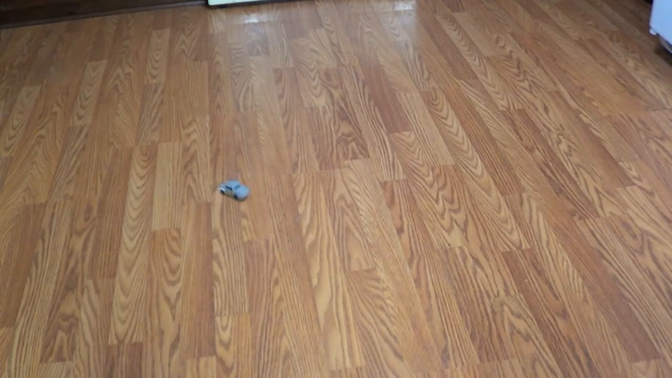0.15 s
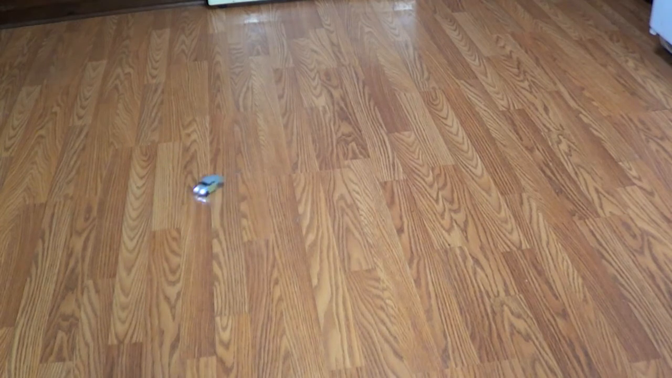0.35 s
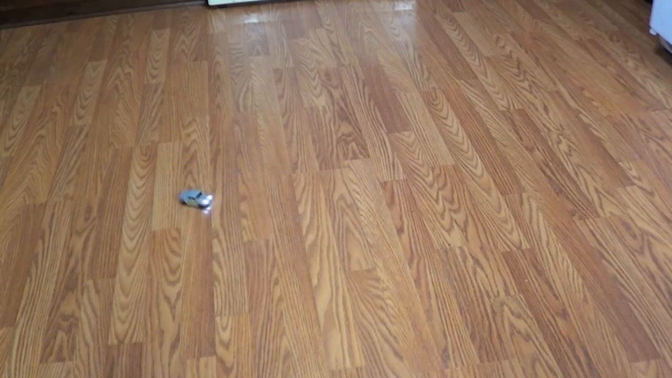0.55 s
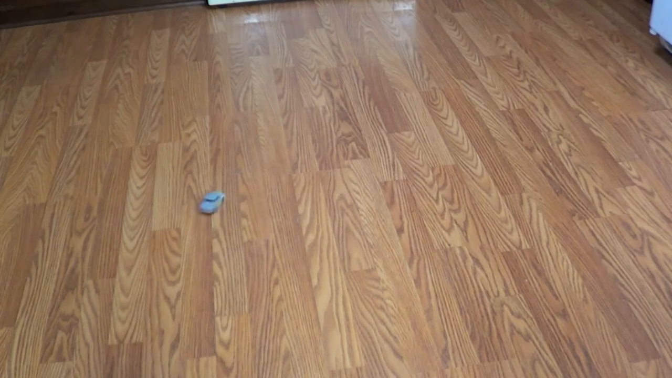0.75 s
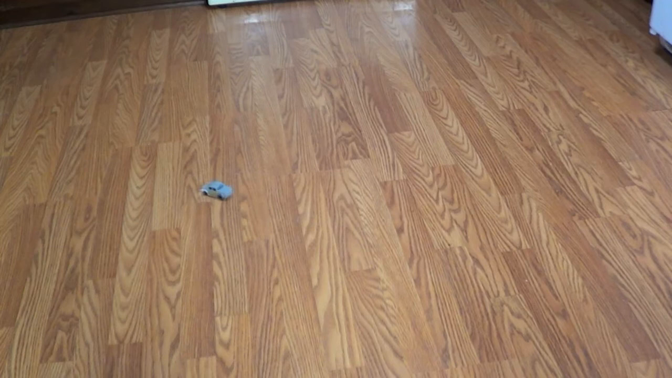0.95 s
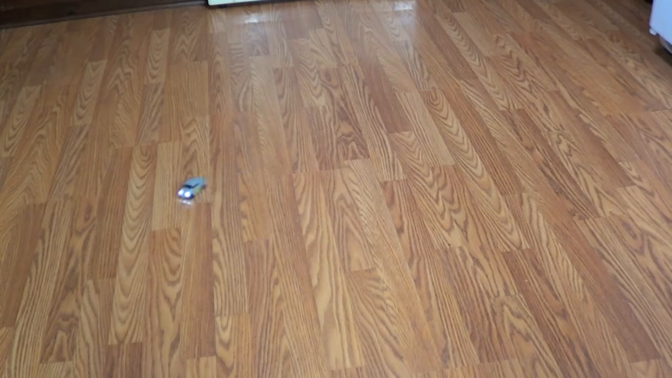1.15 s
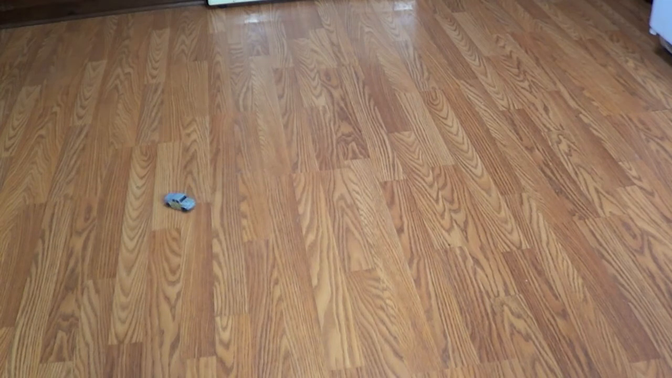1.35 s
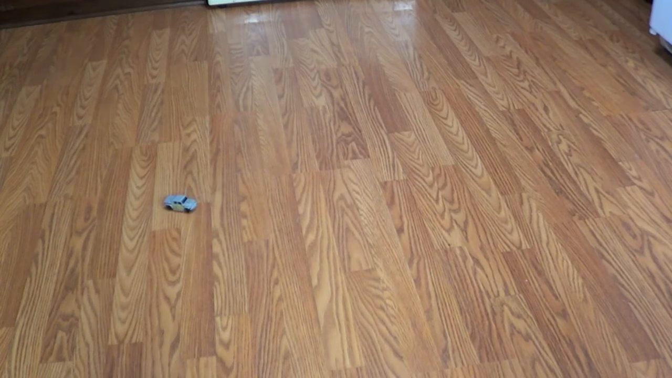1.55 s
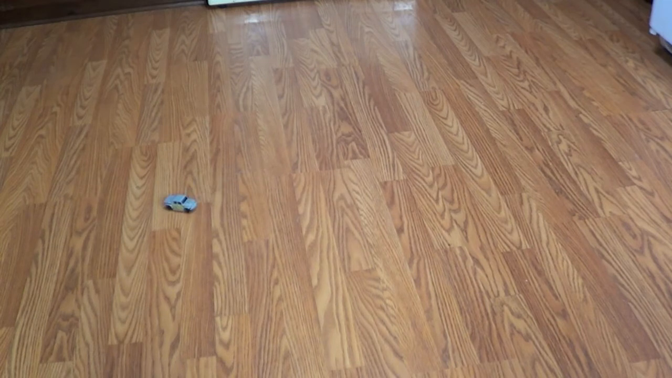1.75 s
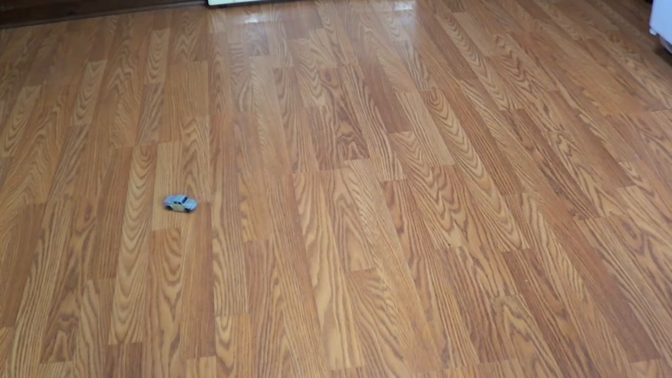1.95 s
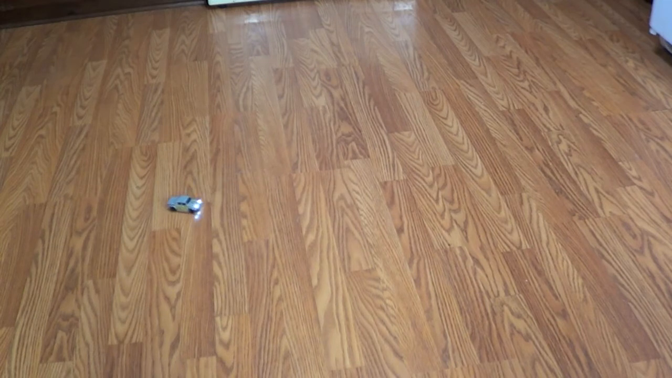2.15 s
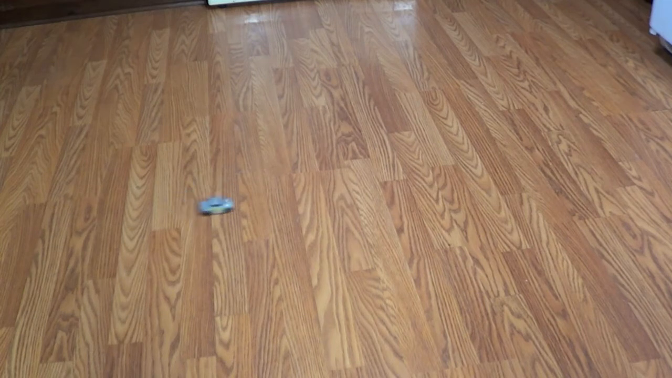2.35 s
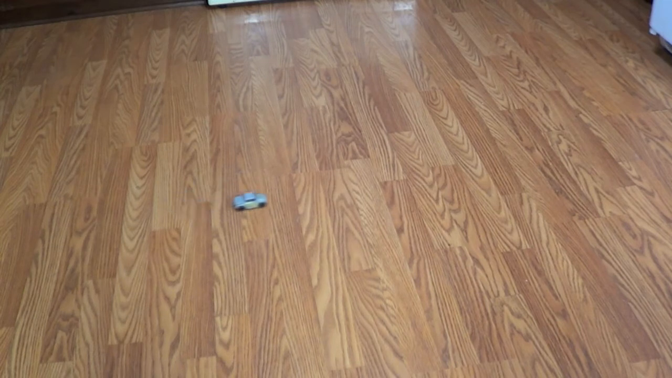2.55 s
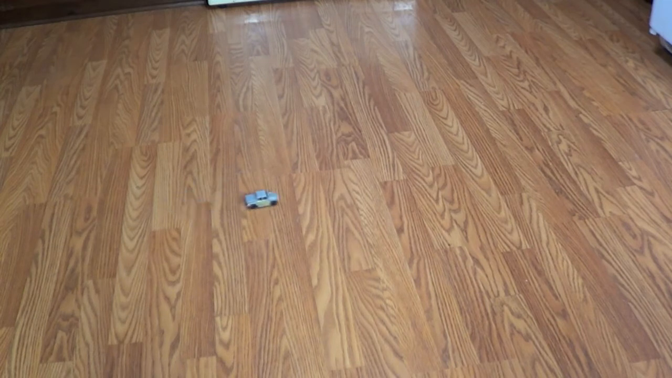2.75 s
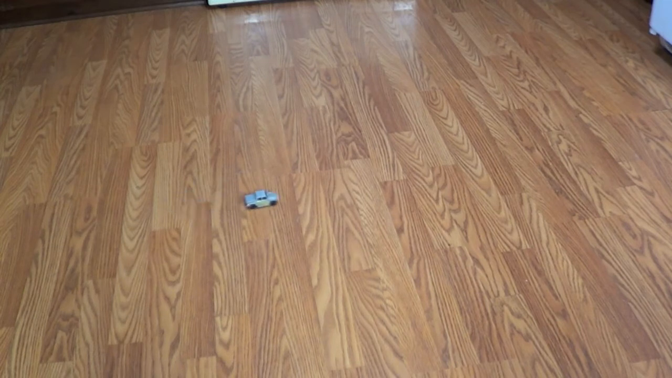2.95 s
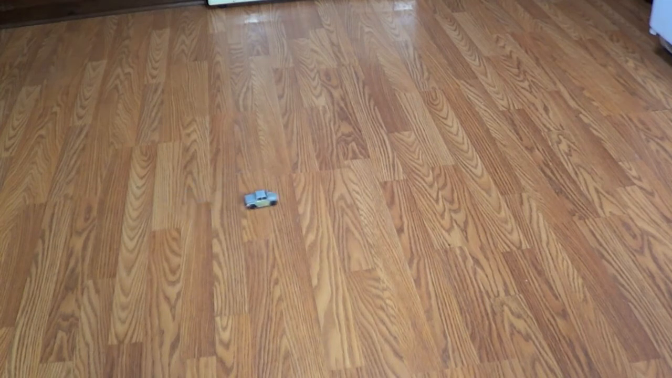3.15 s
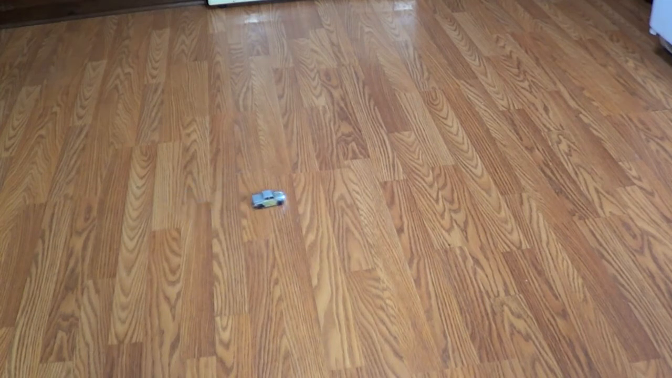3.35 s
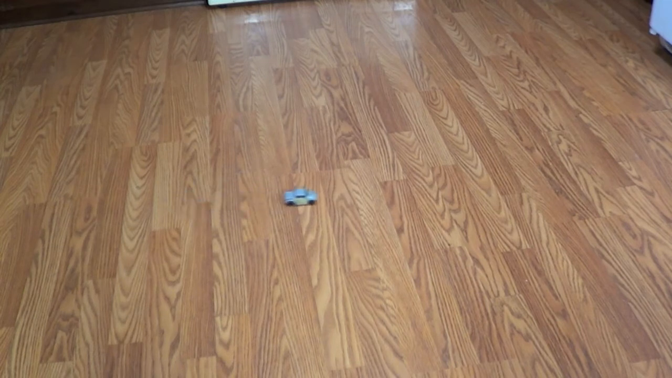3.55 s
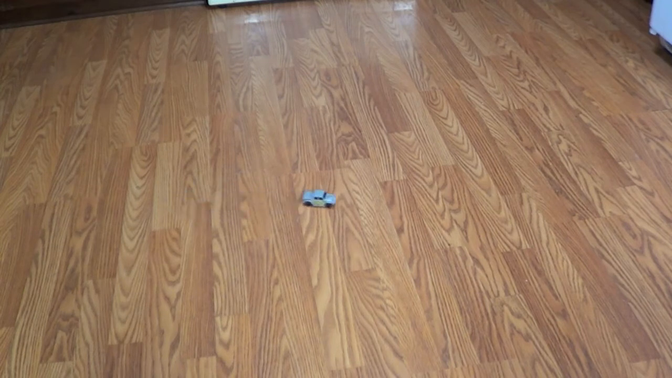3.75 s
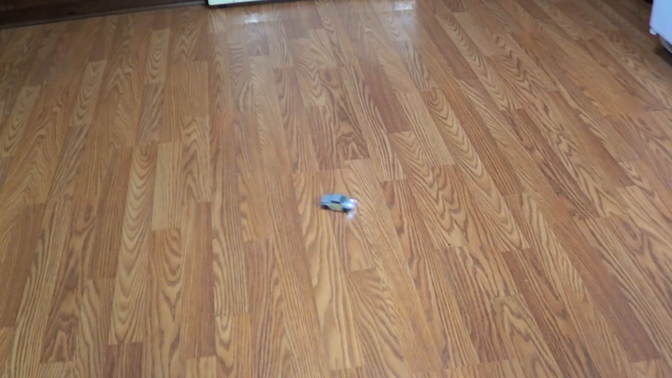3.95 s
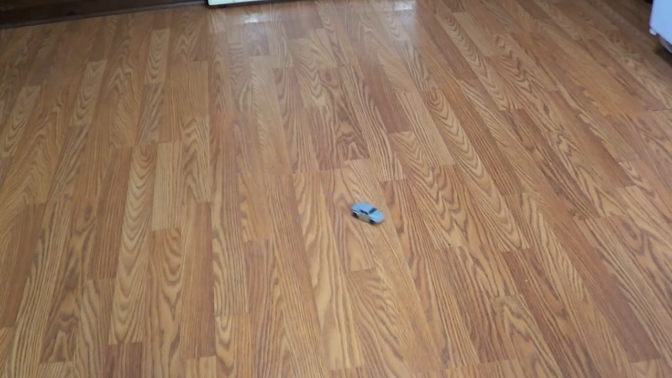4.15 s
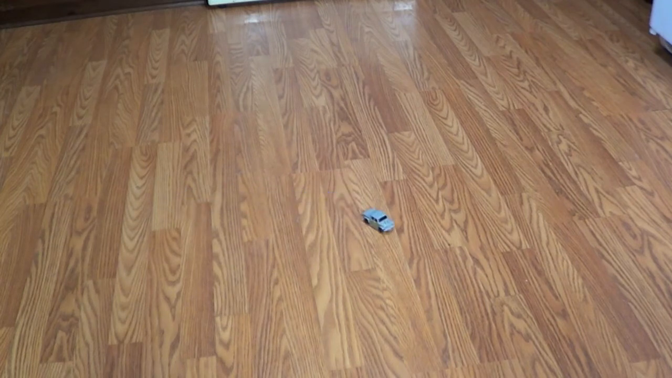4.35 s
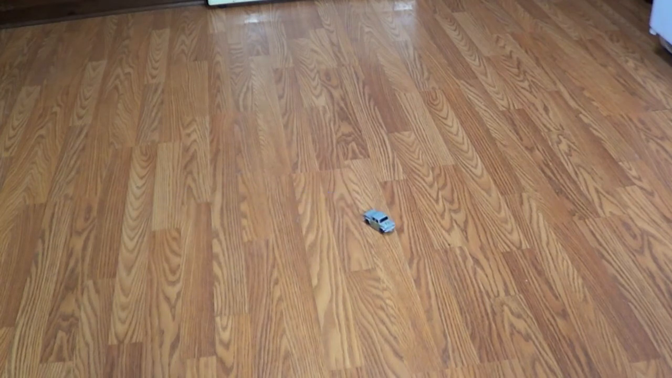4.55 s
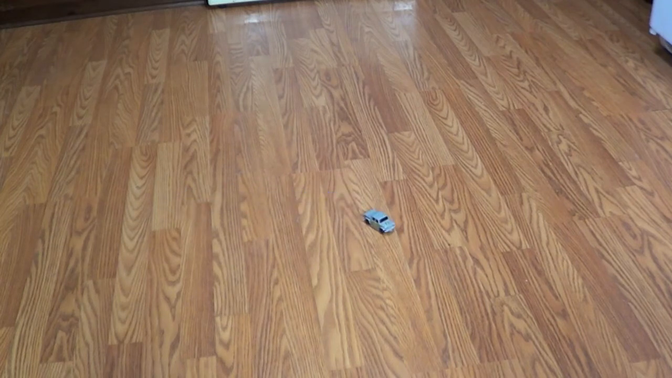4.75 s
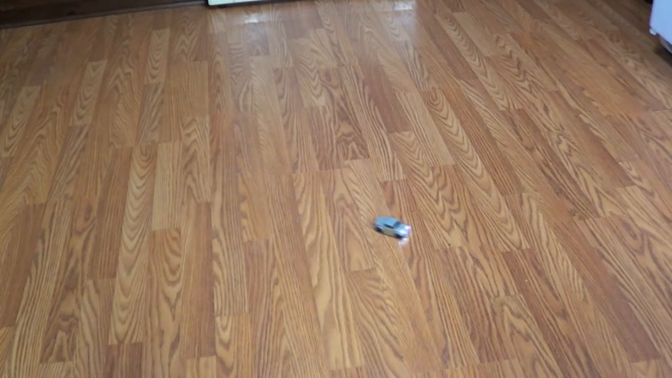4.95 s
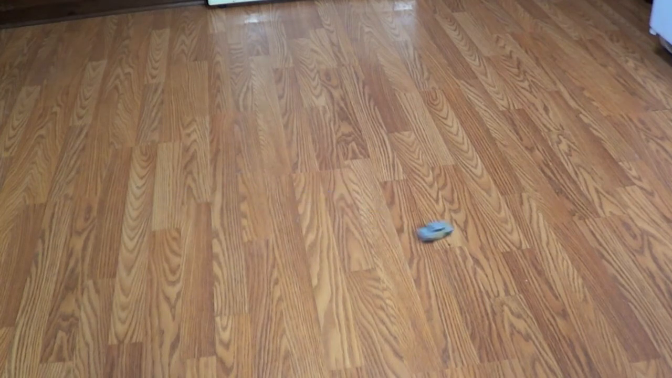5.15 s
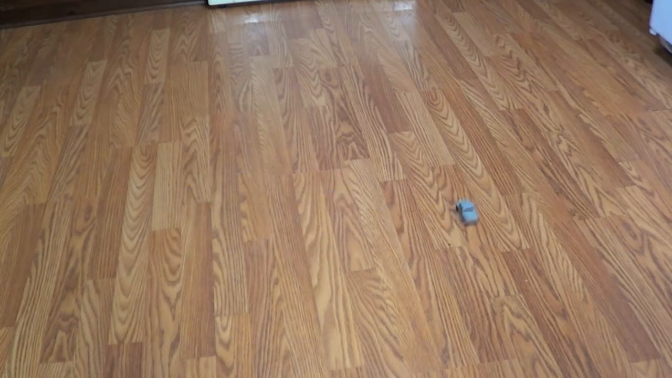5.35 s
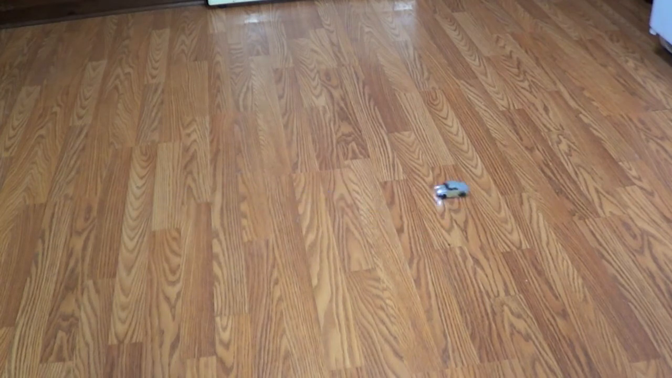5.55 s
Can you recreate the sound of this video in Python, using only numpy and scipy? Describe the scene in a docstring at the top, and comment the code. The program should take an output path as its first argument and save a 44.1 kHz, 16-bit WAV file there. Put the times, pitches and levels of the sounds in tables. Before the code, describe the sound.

A tiny toy car whirs and rattles in high-pitched bursts across a wooden floor while remote buttons click close by on the left.

```python
"""A hum and a faint hiss lie under a palm-sized toy car that is already running on a wooden floor.
Its plastic gears rattle in the shell and its wheels drum on the boards: irregular impacts ring resonances.
From about one second on, the buttons of a remote click close by on the left, as short rings and cracks.
The car goes on in bursts, coasting after some of them, with one soft bump and a brief skid after four
seconds; the last burst runs to the end. A small room answers the car and the remote with fading noise."""
import sys
import numpy as np
from scipy import signal
from scipy.fft import rfft, irfft, next_fast_len
from scipy.io import wavfile
from scipy.ndimage import uniform_filter1d, map_coordinates

SR = 44100
rng = np.random.default_rng(int(sys.argv[2]) if len(sys.argv) > 2 else 0)


def generate_wav(signal):
    """Clip the signal to [-1, 1] and save it as 16-bit WAV at the path in sys.argv[1]."""
    frames = np.transpose(np.atleast_2d(signal))
    scaled = np.clip(frames, -1, 1) * 32767
    pcm = np.round(scaled).astype(np.int16)
    wavfile.write(sys.argv[1], SR, pcm)


N = 246519  # length in samples


def amp(db):
    """Turn a level in dB into a gain."""
    return 10 ** (np.asarray(db) / 20)


def unit(x):
    """Scale x to an average (rms) level of 1."""
    return x / np.sqrt(np.mean(x ** 2) + 1e-20)


def along(points, hz):
    """Read a curve of (Hz, value) points, with straight lines on a log pitch axis."""
    point_hz, value = np.transpose(points)
    return np.interp(np.log(hz + 1), np.log(point_hz + 1), value)


def wobble(rate):
    """A smooth random curve through `rate` random points a second."""
    points = rng.standard_normal(int(N * rate / SR) + 4)
    return map_coordinates(points, [np.arange(N) * rate / SR])


def filtered(x, response):
    """Multiply the spectrum of x by a response that depends on frequency."""
    size = next_fast_len(N + SR // 2)  # spare room so that ringing does not wrap around
    spectrum = rfft(x, size) * response(np.fft.rfftfreq(size, 1 / SR))
    return irfft(spectrum, size)[..., :N]


def resonant(modes):
    """The response of a body that rings at each (Hz, width in Hz, dB) mode; narrow modes ring longer."""
    def response(f):
        total = 0
        for k, (center, width, db) in enumerate(modes):
            peak = 1j * f * width / (center * center - f * f + 1j * f * width)
            total = total + (-1) ** k * amp(db) * peak  # neighbours have opposite signs
        return total
    return response


def contacts(per_s, spread_db):
    """Irregular impacts of either sign, of even power at any rate; a few are far stronger than the rest."""
    hit = rng.random(N) < per_s / SR
    sign = rng.choice([-1, 1], N)
    strength = amp(spread_db * rng.exponential(size=N)) / np.sqrt(per_s)
    return unit(hit * sign * strength)


def patchy(x, patchy_db):
    """Give x slowly wandering patches of emphasis in pitch and time, as a source turns and moves."""
    z = signal.stft(x, nperseg=512)[2]
    field = uniform_filter1d(rng.standard_normal(z.shape), size=7, axis=0)  # smooth over pitch
    field = uniform_filter1d(field, size=20, axis=1)  # smooth over time
    return signal.istft(z * amp(patchy_db * unit(field)), nperseg=512)[1][:N]


def column(values):
    """Stand one value for each layer in a column, ready to meet a time axis."""
    return np.array(values)[:, None]


def background():
    """An appliance hums in slightly unsteady pure tones over hiss that the two sides partly share."""
    # Hum tones. Each row: pitch in Hz, level in dB rms.
    hum_lines = [(240, -60), (960, -66), (1200, -81), (1680, -77), (2160, -76), (11834, -73.5),
                 (15612, -68)]
    # Colour of the hiss. Each row: pitch in Hz, relative level in dB.
    hiss_color = [(15, -30), (25, -10), (95, -4), (180, -4), (350, -4), (700, -4.5), (1400, -8),
                  (2200, -10.5), (3800, -12.5), (9300, -19), (15500, -20.5)]
    # How alike left and right hiss are. Each row: pitch in Hz, likeness from -1 (opposite) to 1 (same).
    likeness = [(30, 1), (250, 0.34), (640, -0.46), (1400, -0.44), (3100, 0.3), (7000, 0.49), (15000, 1)]
    hiss_db = -54.95  # rms

    t = np.arange(N) / SR
    hum = np.zeros(N)
    for hz, db in hum_lines:
        cycles = hz * t + rng.random() + 0.02 * wobble(3)
        hum += np.sqrt(2) * amp(db + 0.5 * wobble(4)) * np.sin(2 * np.pi * cycles)

    def mid_side_color(hz):
        turn = np.arccos(np.clip(along(likeness, hz), -1, 1)) / 2
        return amp(along(hiss_color, hz)) * [np.cos(turn), np.sin(turn)]

    mid, side = filtered(rng.standard_normal((2, N)), mid_side_color)
    hiss = unit(np.array([mid + side, mid - side]))
    return hum * amp([[-0.2], [0.2]]) + amp(hiss_db) * hiss  # hum leans slightly right


def drive():
    """Gains of rattle, wheels, shell, pinion and boom: spin-up, hold and release, then free-wheeling."""
    # Throttle bursts. Each row: start in seconds, end in seconds, speed already there at the start (0-1),
    # gear rattle at start and at end in dB; then, in dB above the rattle: wheels at start, wheels at end,
    # shell, pinion; last, boom of the boards in dB above the wheels.
    bursts = [(-0.5, 1.335, .9, -26, -21.5, -16.5, -16.5, -12, -2.5, -10),
              (2.111, 2.405, 0.18, -22.5, -23, -14, -16, -11.5, -4.5, -8.5),
              (3.279, 3.53, .02, -25, -23, -12.5, -14.5, -10.5, -3, -6),
              (3.839, 4.08, 0.56, -22, -23, -10, -15, -11, -1.5, -11.5),
              (4.835, 5.77, .35, -21, -22, -16.5, -17.5, -12.5, -4, -16)]
    # Free-wheeling. Each row: loudest moment in seconds, gear rattle in dB, sag in dB per second,
    # standstill in seconds, pinion in dB above the rattle.
    coasts = [(2.5, -33, 32, 2.71, -3.5), (3.62, -36, 30, 3.85, -0.5), (4.24, -33, 71, 4.44, -3.5)]
    # The tyres grab and the shell shudders. Each row: start in seconds, level in dB.
    skids = [(4.418, -46)]
    # Sets of four are for rattle, wheels, shell, pinion.
    spin_up_s, spin_up_db = (0.03, 0.036, 0.014, 0.016), (-8, -8.5, -16, -8)  # start from rest this far down
    release_db_per_s = (232, 260, 195, 290)  # dying away once the power is cut
    swell_db, swell_per_s = (0.7, 0.6, 0.68, 1.22), 18  # wavering under load
    coast_wheels_db, coast_shell_db = -20, -11  # against the rattle
    take_up_db_per_s = 57  # rise as the wheels start to drive the gears
    halt_db_per_s = 150  # extra fall at standstill
    skid_hold_s, skid_db_per_s, skid_share_db = 0.026, 250, (-3, -9, -1, -22)

    t = np.arange(N) / SR
    power, boom = np.zeros((4, N)), np.zeros(N)
    waver_db = column(swell_db) * np.array([wobble(swell_per_s) for _ in swell_db])
    for on, off, rolling, gear_on, gear_off, wheel_on, wheel_off, shell_db, pinion_db, boom_db in bursts:
        gear_db = np.interp(t, [on, off], [gear_on, gear_off])
        wheel_db = np.interp(t, [on, off], [wheel_on, wheel_off])
        held_db = gear_db + [0 * t, wheel_db, shell_db + 0 * t, pinion_db + 0 * t]
        closing_in = np.exp(-np.maximum(t - on, 0) / column(spin_up_s))
        start_db = (1 - np.clip(rolling, 0, 1)) * column(spin_up_db) * closing_in
        release_db = column(release_db_per_s) * np.maximum(t - off, 0)
        power += (t >= on) * amp(held_db + start_db - release_db + waver_db) ** 2
        boom[t >= on] = amp(boom_db)

    for loudest, db, sag, still, pinion_db in coasts:
        rise_db = take_up_db_per_s * np.maximum(loudest - t, 0)
        sag_db = sag * np.maximum(t - loudest, 0)
        halt_db = halt_db_per_s * np.maximum(t - still, 0)
        layers_db = column([0, coast_wheels_db, coast_shell_db, pinion_db])
        cut = max(row[1] for row in bursts if row[1] < loudest)
        restart = min(row[0] for row in bursts if row[0] > loudest)
        coasting = (t >= cut) * (t < restart)
        power += coasting * amp(db - rise_db - sag_db - halt_db + layers_db) ** 2

    for s, db in skids:
        fall_db = skid_db_per_s * np.maximum(t - s - skid_hold_s, 0)
        power += (t >= s) * amp(db + column(skid_share_db) - fall_db) ** 2
    return (*np.sqrt(power), boom)


def car():
    """Tooth impacts ring the gearbox, the motor pinion and the shell; the wheels drum on the boards."""
    # What rings: gearbox, motor pinion, shell, floor boards, and the hollow under the boards.
    # Each row: pitch in Hz, width in Hz, relative level in dB.
    gear_modes = [(4166, 150, -9.5), (5420, 620, 0.5), (6040, 960, -8.5), (11750, 6400, -11.5)]
    pinion_modes = [(7765, 1240, -5.5), (8600, 230, 0.5), (9050, 440, -1), (10004, 2060, -5.5)]
    shell_modes = [(1460, 250, -9.5), (2324, 140, 1), (2660, 205, -2), (2853, 64, 4.5), (3007, 128, -0.5),
                   (3390, 360, -6)]
    board_modes = [(662, 20.5, 1.5), (713, 24.4, 2), (832, 94, 0), (974, 93, 2), (1140, 200, -1.5)]
    joist_modes = [(406.3, 27, -9.5), (580, 27.4, 1)]
    # Broad rush of the gears between the ringing pitches. Each row: pitch in Hz, relative level in dB.
    gear_wash = [(3000, -20), (4000, -6.5), (6000, -3), (7000, -5), (10000, -14.5), (11500, -35.5),
                 (15500, -31)]
    # Single teeth that knock as the gears take up or lose load. Each row: time in seconds, relative dB.
    tooth_knocks = [(2.1122, -15), (2.5247, -20.5), (2.5404, -17), (2.5543, -20), (2.581, -21),
                    (2.6005, -17), (2.6863, -30.5), (3.2805, -19), (3.2869, -25), (3.2934, -22),
                    (3.3079, -22), (3.332, -13), (3.8404, -10), (4.227, -29), (4.2548, -21), (4.2944, -33),
                    (4.3316, -33), (4.35, -30), (4.371, -29), (4.836, -15), (5.0104, -17)]

    gear, wheel, shell, pinion, hollow = drive()
    speed = np.clip(gear / amp(-24), 0.12, 1)  # coasting gears touch more rarely
    slack = wobble(130)  # gear play opens and closes, bunching the impacts

    box = resonant(gear_modes)
    teeth = contacts(per_s=5000 * speed, spread_db=1.5) * amp(0.8 * slack + 0.63 * wobble(14))
    rattle = filtered(teeth, lambda f: box(f) * amp(along([(2500, -27), (4000, 6)], f))
                      + amp(along(gear_wash, f)))

    pinion_ring = resonant(pinion_modes)
    high = lambda f: pinion_ring(f) * amp(along([(5000, -5), (7500, -1.5)], f))
    mesh = contacts(per_s=2500 * speed, spread_db=2.0) * amp(0.62 * slack + 0.72 * wobble(300))
    whir = filtered(mesh, high)

    taps = contacts(per_s=4000 * speed, spread_db=0.5) * amp(1.2 * slack + 0.46 * wobble(20))
    buzz = filtered(taps, resonant(shell_modes))

    boards = resonant(board_modes)
    board_tilt = [(300, -19), (620, 0), (1300, -2), (2000, -18)]  # (Hz, dB)
    bumps = contacts(per_s=1500, spread_db=1.5) * amp(1.7 * wobble(25))
    drum = filtered(bumps, lambda f: boards(f) * amp(along(board_tilt, f)))
    boom = unit(filtered(contacts(per_s=800, spread_db=0.5), resonant(joist_modes)))
    drum = unit(patchy(drum, patchy_db=1.8)) + hollow * boom

    knocks = np.zeros(N)
    for s, db in tooth_knocks:
        knocks[round(s * SR)] = amp(db + 21.5)
    knocking = filtered(knocks, lambda f: high(f) + 0.16 * box(f))

    return (amp(-3.5) * gear * unit(patchy(rattle, patchy_db=2.0))
            + amp(0.5) * pinion * unit(patchy(whir, patchy_db=1.16))
            + shell * unit(patchy(buzz, patchy_db=0.85))
            + wheel * drum + knocking)


def room(x):
    """The walls' answer: noise echoes, drawn anew every 1/8 s, in which each pitch dies at its own speed."""
    # How long echoes last. Each row: pitch in Hz, seconds to fall by 60 dB.
    decay_times = [(300, 0.25), (2000, 0.25), (8000, 0.3), (15000, 0.031)]
    # How wide the answer is. Each row: pitch in Hz, relative level in dB of the left-right difference.
    echo_width = [(60, -15), (110, -10), (200, -8), (380, -9), (700, -19), (1290, -12), (2380, -15),
                  (4400, -11.5), (8120, -10), (15000, -15.5)]

    step = SR // 8
    out = np.zeros((2, N + 2 * SR))
    padded = np.pad(x, (step, 2 * step))
    fade = np.sqrt(np.hanning(2 * step))  # slices overlap by half
    for start in range(0, N + step, step):
        hz, t, z = signal.stft(rng.standard_normal((2, SR // 2)), SR, nperseg=256)
        decay = amp(-60 * t / along(decay_times, hz)[:, None])
        tail = signal.istft(z * decay, SR, nperseg=256)[1]
        piece = padded[start:start + 2 * step] * fade
        wet = signal.fftconvolve(piece[None], tail / np.linalg.norm(tail[0]), axes=1)
        out[:, start:start + wet.shape[1]] += wet
    late = out[:, step - 150:][:, :N]  # the answer starts 150 samples after the sound
    mid, side = filtered(late, lambda f: np.array([np.ones_like(f), amp(along(echo_width, f) + 7)]))
    return np.array([mid + side, mid - side])


def remote():
    """Each snap rings the hollow case and the grip for a few cycles; a few ms of chatter crack in the key."""
    # Button clicks. Each row: time in seconds, relative level in dB, case pitch in Hz,
    # relative level of the crack in dB, relative level of the knock in dB (both on top of the click's).
    clicks = [(1.2063, -26, 1500, 2.5, -19.5), (2.01, -47.5, 1660, -2, -10), (2.061, -21, 1590, -7, -12),
              (2.606, -23.5, 1676, 2.5, -19), (2.6589, -37, 1730, -7, -12), (2.814, -37.5, 1600, -4.5, -15),
              (2.825, -45, 1610, -5, -8), (3.106, -39.5, 1500, -9.5, -14), (3.1564, -52, 1640, -9, -17),
              (3.2272, -21, 1630, -6, -11.5), (3.2334, -37, 1480, -10, -23), (3.485, -29, 1590, -10, -10),
              (3.703, -44, 1700, -6, -11), (3.731, -34.5, 1610, -6, -20), (3.7774, -17, 1740, -4, -19.5),
              (4.0183, -23.5, 1496, -13, -13), (4.3807, -42, 1560, -2, 3.5), (4.4163, -36.5, 1750, 4, -9),
              (4.4269, -36, 1530, 4, -6), (4.6992, -45, 1400, -3, -6), (4.713, -33.5, 1670, -4, -15),
              (4.78, -18.5, 1600, -11, -14.5), (4.7918, -26, 1440, -0.5, -9)]
    # What rings in the key. Each row: pitch in Hz, width in Hz, relative level in dB.
    key_modes = [(2370, 500, 7.5), (3000, 290, 10), (3800, 450, 6.5), (5200, 1900, -1), (9400, 2500, -10)]
    grip_hz = 756
    hand_pan_db = 9.5  # held to the left: left minus right
    wall_s, wall_db = 0.0265, -22  # the facing wall returns each click to both sides

    case, key = np.zeros((2, N + SR)), np.zeros((2, N + SR))
    t = np.arange(SR // 20) / SR
    onset = 1 - np.exp(-t / 0.00093)
    chatter_fade = np.exp(-(t / 0.0044) ** 2) + 0.084 * amp(-60 * t / 0.068)
    ring_fade = np.exp(-(t / 0.0023) ** 2) + 0.09 * amp(-60 * t / 0.05)
    for s, db, case_hz, crack_db, knock_db in clicks:
        chatter = rng.standard_normal(len(t)) * chatter_fade
        ring = ring_fade * np.sin(2 * np.pi * case_hz * t)
        knock = amp(knock_db + 4.0 - 60 * t / 0.015) * np.sin(2 * np.pi * grip_hz * t)
        sides = amp(db + np.array([[hand_pan_db], [-hand_pan_db]]) / 2)
        here = slice(round(s * SR), round(s * SR) + len(t))
        case[:, here] += amp(2.0) * sides * (ring + knock) * onset
        key[:, here] += sides * amp(crack_db + 21) * chatter / np.linalg.norm(chatter)
    near = case[:, :N] + filtered(key[:, :N], resonant(key_modes))
    echo = np.pad(near.mean(axis=0), (round(wall_s * SR), 0))[:N]
    return near + amp(wall_db) * echo


def thuds():
    """A soft push: a slow puff of noise through the low resonances of the floor."""
    # Soft low bumps. Each row: time in seconds, relative level in dB.
    soft_bumps = [(4.292, -40)]
    out = np.zeros(N + SR)
    t = np.arange(SR // 4) / SR
    for s, db in soft_bumps:
        puff = amp(db + 24.5 - 60 * t / 0.13) * (1 - np.exp(-t / 0.015))
        out[round(s * SR):][:len(t)] += puff * rng.standard_normal(len(t))
    low = resonant([(236, 59, 6.5), (328, 89, -2.5), (450, 80, 0.5)])  # (Hz, width Hz, dB)
    # weaken everything outside roughly 180 to 600 Hz
    return filtered(out[:N], lambda f: low(f) / (1 + (f / 600) ** 4) / (1 + (180 / (f + 1)) ** 4))


def scene():
    """Car, remote and bump in the room, over the background."""
    # Where the car is. Each row: time in seconds, left minus right in dB.
    path = [(0, 0.8), (1.3, 0.86), (4.0, 1.0), (4.9, 0), (5.59, -0.5)]
    toy = filtered(car(), lambda hz: 1j * hz / (350 + 1j * hz))  # so small a body radiates little bass
    hand = remote()
    pan_db = np.interp(np.arange(N) / SR, *np.transpose(path))
    direct = toy * amp(np.array([pan_db, -pan_db]) / 2 - 1.91)
    echoes = amp(-8.5) * room(toy) + amp(-10) * room(hand.mean(axis=0))
    return direct + hand + echoes + thuds() + background()


def record(dry):
    """The microphone fades at the very top, and nothing passes above the band limit."""
    top_hz = 15650
    treble = [(14000, 0.5), (15300, -3.5)]  # (Hz, dB)
    return filtered(dry, lambda hz: amp(along(treble, hz)) * (hz < top_hz))


dry = scene()
out = record(dry)
generate_wav(out)
```